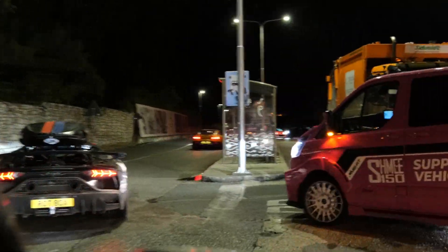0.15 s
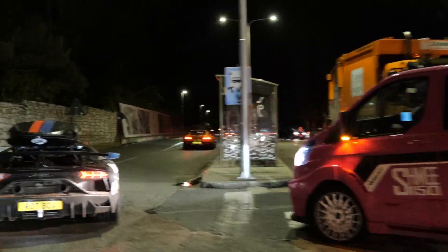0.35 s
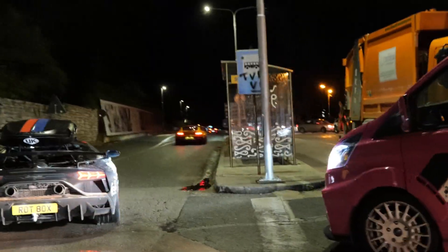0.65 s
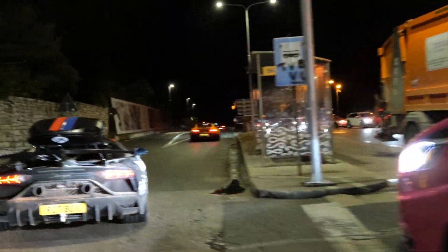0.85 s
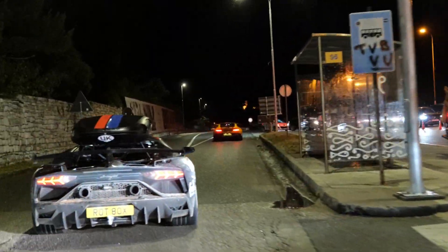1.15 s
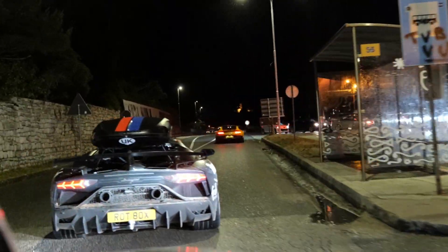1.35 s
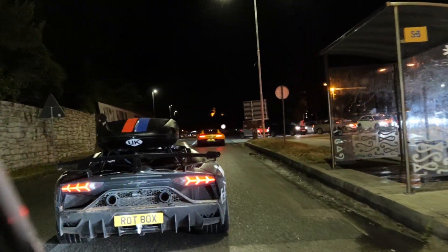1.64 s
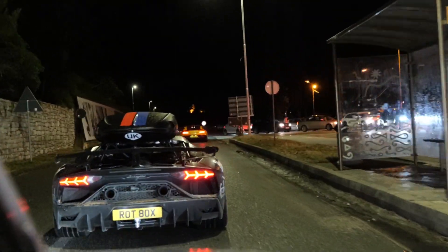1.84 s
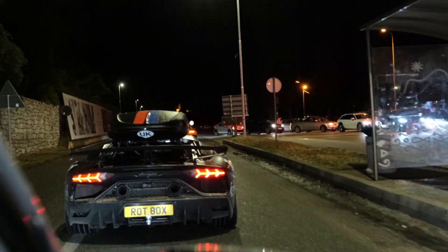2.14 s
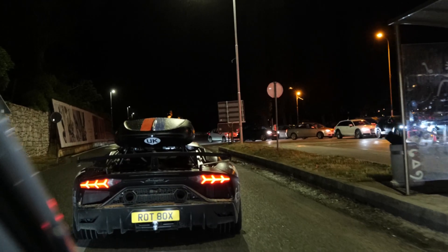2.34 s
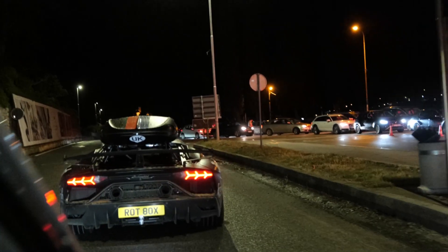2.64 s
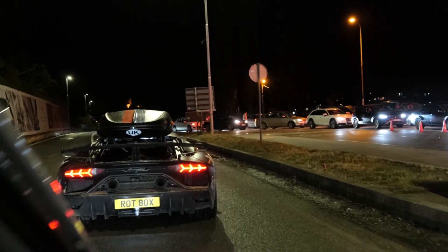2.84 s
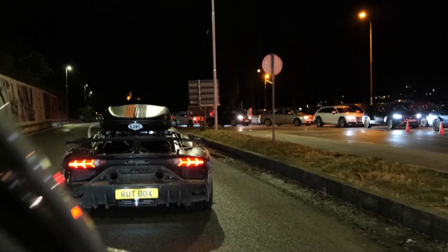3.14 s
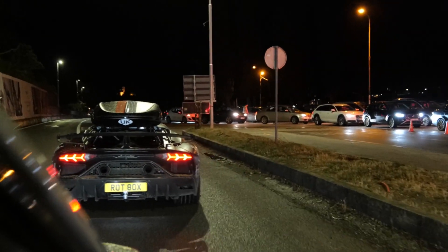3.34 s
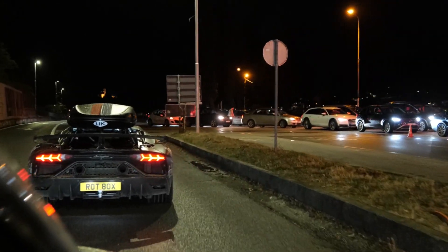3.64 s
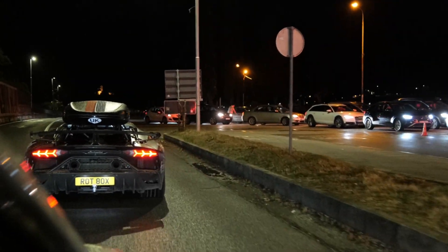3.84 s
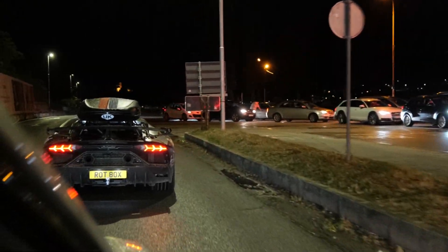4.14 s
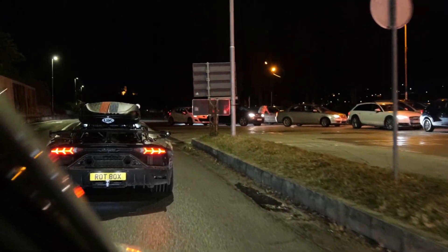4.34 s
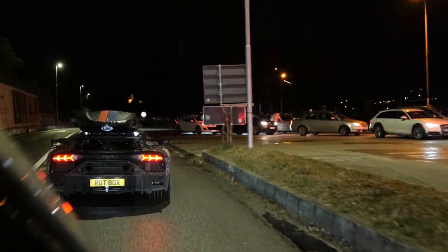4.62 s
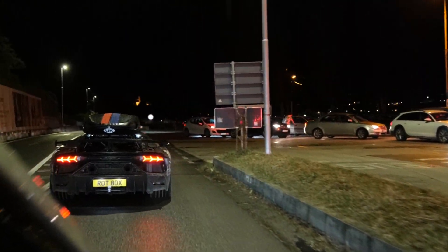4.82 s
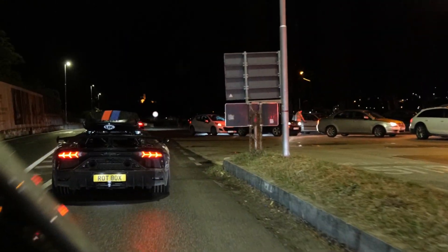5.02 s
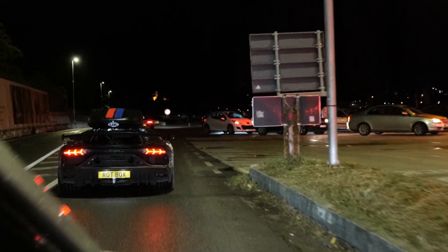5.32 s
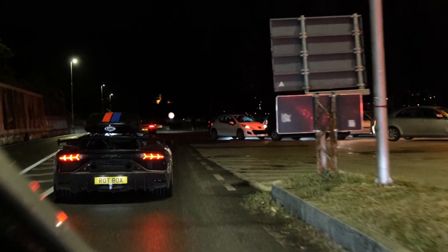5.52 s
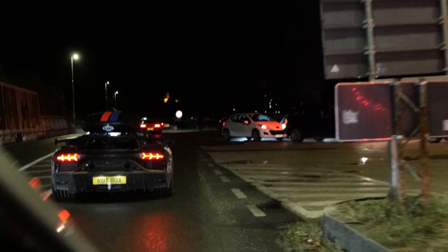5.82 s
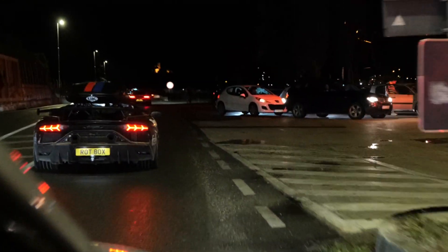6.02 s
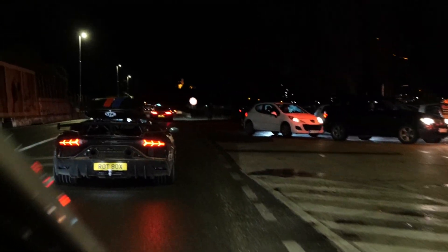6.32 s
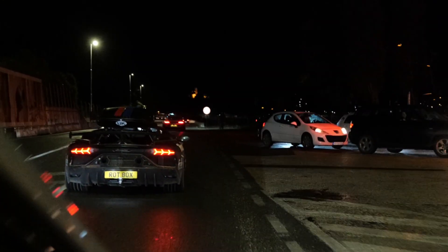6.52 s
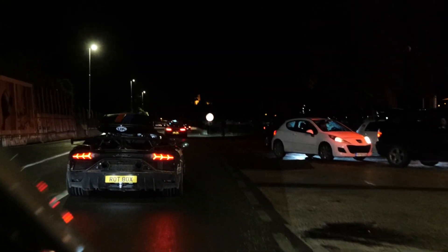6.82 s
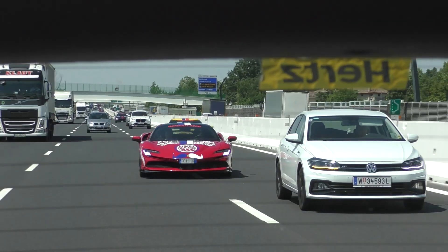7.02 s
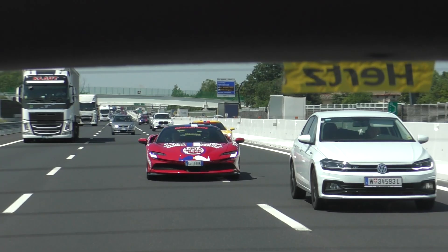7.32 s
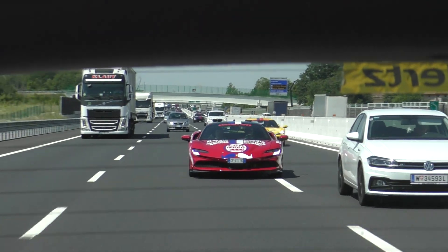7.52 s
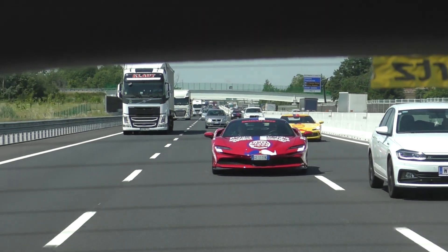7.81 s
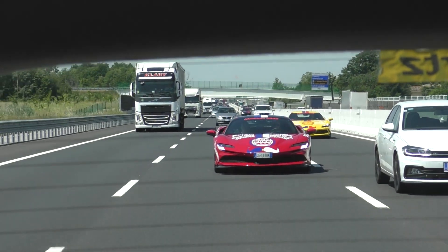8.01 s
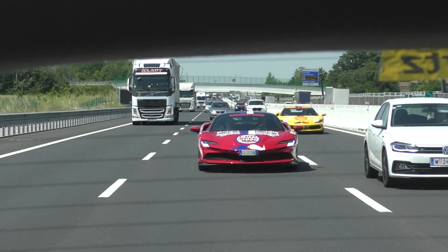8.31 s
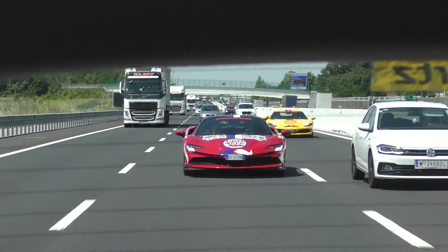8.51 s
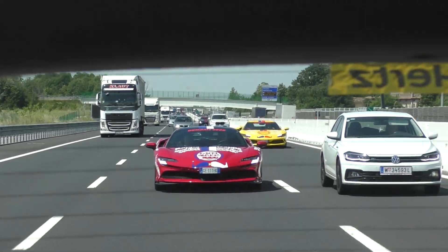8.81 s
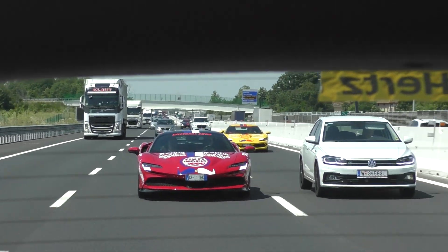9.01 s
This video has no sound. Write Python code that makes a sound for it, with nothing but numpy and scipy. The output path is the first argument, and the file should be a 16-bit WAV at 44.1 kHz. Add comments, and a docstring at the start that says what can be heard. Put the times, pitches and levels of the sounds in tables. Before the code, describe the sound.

Inside a sports car in town, an engine drones over low road rumble. A short whistling chirp and a booming thump mark an upshift; the pitch drops, shudders, then climbs hard with a hollow, rasping exhaust. The throttle closes and the exhaust crackles and pops in clumps. A hard cut brings a closed motorway cabin with steady tyre rumble, muffled wind and a soft hum.

```python
"""A droning engine over road rumble, heard inside a sports car: it chirps and thumps through an upshift,
then pulls hard with a rasping exhaust. The throttle closes and the exhausts crackle and pop.
Then the scene changes abruptly to a closed cabin on a motorway, with road rumble and a steady hum.
Engine and hum are tones following a speed curve; gas, air, road and crackle are shaped noise; pops are
push-and-suction pulses. Cabin reflections spread each scene over left and right."""
import sys
import numpy as np
from scipy import signal
from scipy.fft import rfft, irfft
from scipy.io import wavfile
from scipy.ndimage import uniform_filter1d

SR = 44100
rng = np.random.default_rng(int(sys.argv[2]) if len(sys.argv) > 2 else 0)


def wrap_up_sound(samples):
    """Save the sound to the file named by the first command line argument, as 16-bit audio."""
    columns = np.atleast_2d(samples).T
    # keep every value between -1 and 1, then stretch to whole-number steps
    tamed = np.clip(columns, -1, 1)
    steps = np.round(tamed * 32767).astype(np.int16)
    wavfile.write(sys.argv[1], SR, steps)


N = 403956
T = np.arange(N) / SR  # seconds
HZ = np.fft.rfftfreq(N, 1 / SR)
CUT_S = 6.9  # town gives way to motorway

# single reports in the exhaust, before trim and muffling:
# start_s, peak_db, centre_hz, ring_db (ring of the pipes)
POPS = [(3.246, -11, 400, -24), (4.939, -17, 500, -25), (5.063, -15, 420, -25), (5.088, -13, 190, -26),
        (5.126, -14, 450, -25), (5.187, -15, 600, -25), (5.302, -16, 450, -28), (5.325, -14, 1000, -24),
        (5.371, -15, 170, -27), (5.421, -12, 170, -21), (5.426, -14, 650, -24), (5.436, -14, 550, -22),
        (5.445, -12, 480, -22), (5.461, -18, 1000, -35), (5.487, -15, 550, -26), (5.494, -17, 1100, -28),
        (5.526, -14, 600, -26), (5.549, -15, 480, -25), (5.572, -13, 520, -23), (5.617, -11, 500, -21),
        (5.633, -16, 600, -30), (5.661, -14, 450, -25), (5.67, -10, 650, -22), (5.712, -17, 800, -32),
        (5.753, -12, 650, -24), (5.774, -14, 600, -27), (5.795, -14, 480, -21), (5.818, -15, 500, -24),
        (5.828, -14, 1300, -25), (5.843, -10, 450, -19), (5.859, -11, 420, -21), (5.879, -15, 1700, -33),
        (5.9, -16, 900, -26), (5.936, -14, 1700, -31), (5.977, -15, 650, -25), (5.991, -11, 480, -24),
        (6.017, -17, 2200, -33), (6.101, -16, 600, -24), (6.167, -12, 400, -24), (6.182, -12, 1700, -27),
        (6.244, -16, 1400, -25), (6.313, -18, 1100, -38), (6.339, -7, 190, -22), (6.351, -15, 550, -26),
        (6.431, -16, 450, -27), (6.449, -16, 700, -25), (6.509, -15, 550, -23), (6.536, -11, 190, -23),
        (6.618, -17, 600, -28), (6.663, -15, 800, -22), (6.667, -11, 900, -22), (6.679, -13, 900, -21),
        (6.685, -11, 1100, -24), (6.688, -13, 1800, -30), (6.728, -13, 520, -23), (6.737, -18, 900, -24),
        (6.744, -19, 1200, -28), (6.798, -12, 1300, -31), (6.835, -10, 700, -23), (6.845, -16, 800, -25),
        (6.865, -14, 650, -29)]


def amp(db):
    """Decibels to gain."""
    return 10 ** (np.asarray(db) / 20)


def evened(x):
    """Scales to rms 1."""
    return x / np.sqrt(np.mean(x ** 2) + 1e-20)


def steadied(x, span_s=0.13):
    """Holds the short-term rms at 1 and keeps the fine grain."""
    return x / np.sqrt(abs(uniform_filter1d(x ** 2, int(span_s * SR))) + 1e-20)


def curves(rows):
    """Each column of a table of time rows, at every sample."""
    s, *columns = np.transpose(rows)
    return [np.interp(T, s, c) for c in columns]


def ramp(start, end):
    """Rises from 0 to 1 between two times."""
    return np.clip((T - start) / max(end - start, 1e-3), 0, 1)


def waver(rate_hz, size=64):
    """Slow random drift of rms 1, drawn on every 64th sample."""
    t = T[::size]
    hz = np.fft.rfftfreq(len(t), t[1])
    spectrum = rfft(rng.standard_normal(len(t))) / (1 + (hz / rate_hz) ** 2)
    return np.interp(T, t, evened(irfft(spectrum, len(t))))


def response(points):
    """Gain at every frequency from (Hz, dB) points, joined on a log frequency axis."""
    f, db = np.transpose(points)
    return amp(np.interp(np.log(HZ + 1), np.log(f + 1), db))


def band(lo_hz, hi_hz, order=12):
    """Gain of a band with soft shoulders."""
    return 1 / np.sqrt((1 + (lo_hz / (HZ + 1)) ** order) * (1 + (HZ / hi_hz) ** order))


def shaped(x, gain):
    """Filters with a gain over frequency."""
    return irfft(rfft(x) * gain, N)


def struck(x, gain):
    """Filters causally (minimum phase), so that clicks keep a sharp front."""
    cepstrum = irfft(np.log(gain + 1e-6), N)
    fold = (1 + np.sign(N / 2 - np.arange(N))) / (1 + (T == 0))
    return shaped(x, np.exp(rfft(cepstrum * fold)))


def partial(turns, rough):
    """A tone of one cycle per turn, roughened by random shake in both its quadratures."""
    angle = 2 * np.pi * turns
    in_phase = np.cos(angle) * (1 + rough * waver(8))
    return -np.sqrt(2) * (in_phase + np.sin(angle) * rough * waver(11))


def add(mix, s, sound):
    """Lays a sound into the mix at a time."""
    part = mix[round(s * SR):][:len(sound)]
    part += sound[:len(part)]


def rumble(lumpy_db=3.5):
    """Tyres and body panels give a lumpy low noise under a smooth hiss of air."""
    # low noise of tyres and body in town: time_s, level_db
    rumble_level = [(0, -27), (1.0, -26.5), (1.8, -26), (2.4, -20.5), (3.1, -24.5), (3.6, -22.5),
                    (4.3, -27), (5.25, -25), (5.38, -22), (5.6, -25.5), (5.8, -25.5), (6.9, -26)]
    # tint of that noise: freq_hz, relative density_db
    rumble_colour = [(20, -55), (45, -43.5), (65, -39), (90, -14), (125, -1), (210, 6.5), (300, -1),
                     (450, -4), (600, -9), (1200, -19), (5500, -48.5), (10000, -53.5), (15000, -67)]
    # steady hiss of air in the cabin in town: time_s, level_db
    air_level = [(0, -49.5), (2.4, -42), (4.5, -50.5), (5.35, -48.5), (5.5, -55.5), (6.9, -55.5)]
    db, = curves(rumble_level)
    air_db, = curves(air_level)
    noise = shaped(rng.standard_normal(N), response(rumble_colour))
    low = amp(db + lumpy_db * waver(18)) * evened(shaped(noise, band(15, 2200)))
    hiss = amp(air_db) * evened(shaped(noise, band(2600, 15500, order=6)))
    return low + hiss


def motorway(lumpy_db=1.0, gust_db=-1.0):
    """Road rumble, tyre roar and muffled wind in a closed cabin, with the engine humming through."""
    # tint of the cabin noise: freq_hz, relative density_db
    cruise_colour = [(20, -28), (52, -7), (62, 2), (80, 0), (110, 3.5), (145, -3), (185, 1.5), (235, 1),
                     (280, 0.5), (309, 5), (328, -2.5), (360, 0.5), (430, -10), (465, -9), (500, -12),
                     (615, -19), (645, -12.5), (668, -20), (745, -17.5), (780, -26), (930, -24.5),
                     (985, -20), (1050, -30), (1115, -26.5), (1200, -30), (2000, -42), (2800, -48),
                     (5200, -54.5), (7000, -61), (14000, -75)]
    # wind hiss at the window seals, before the overall rise: time_s, level_db
    seal_hiss = [(6.9, -62), (7.6, -64), (8.4, -62), (9.16, -60.5)]
    # engine at a nearly steady speed, easing off: time_s, pitch_hz, level_db
    hum_curve = [(6.9, 237.4, -24), (7.2, 236.5, -28.5), (7.35, 235, -21.5), (7.6, 235, -27),
                 (8.05, 234.5, -25), (8.25, 234.7, -29), (9.16, 235.5, -33)]
    # levels at the change of scene, and a slow rise of the road and wind noise
    road_db, tyres_db, wind_db, rise_db_per_s = -24.5, -32.5, -37.5, 0.56

    air, colour = rng.standard_normal(N), response(cruise_colour)
    road = amp(road_db + lumpy_db * waver(7.7)) * evened(shaped(air, colour * band(15, 248)))
    tyre_noise = shaped(rng.standard_normal(N), colour * band(286, 500))
    tyres = amp(tyres_db + lumpy_db * waver(10)) * evened(tyre_noise)
    wind = amp(wind_db + gust_db * waver(22)) * evened(shaped(air, colour * band(527, 2400)))
    hiss_noise = shaped(rng.standard_normal(N), colour * band(2320, 15000))
    hiss = amp(curves(seal_hiss)[0]) * evened(hiss_noise)
    hum_hz, hum_db = curves(hum_curve)
    hum = amp(hum_db) * partial(np.cumsum(hum_hz) / SR, rough=0.07)
    return (road + tyres + wind + hiss) * amp(rise_db_per_s * (T - CUT_S)) + hum


def bright_bursts(q=1.4):
    """Brief noise bursts, each through one broad resonance, then kept to the treble."""
    # ticks, a hiss at the shift, a puff of gas, sharp exhaust cracks, with levels before filtering:
    # start_s, level_db, centre_hz, decay_s
    burst_list = [(.745, -23.5, 11450, 0.0015), (.805, -38.5, 8900, 0.039), (0.88, -35, 6560, 0.017),
                  (1.042, -36.5, 11530, .004), (1.056, -39, 11960, 0.0063), (1.291, -39.5, 10060, 0.0084),
                  (4.07, -43.5, 4500, 0.031), (4.939, -42.5, 9260, 0.002), (5.379, -47.5, 9800, 0.0059),
                  (6.573, -32.5, 3200, .001), (6.618, -36.5, 5000, 0.0008)]
    out, t = np.zeros(N), T[:4096]
    for s, db, hz, decay in burst_list:
        noise = rng.standard_normal(len(t)) * np.exp(-t / decay)
        burst = signal.lfilter(*signal.iirpeak(hz, q, fs=SR), noise)
        add(out, s, amp(db) * burst)
    return shaped(out, band(2500, 12000, order=10))


def narrow_tones():
    """Noise narrowed to a gliding band gives unsteady tones that swell and fade."""
    # breathy whistles, and engine overtones that swell in a pipe resonance, with levels before fades:
    # start_s, end_s, first_hz, last_hz, width_hz, level_db
    tone_list = [(0, 0.741, 1240, 1238, 50.3, -46.5), (0, 0.691, 1843, 1786, 160, -40.5),
                 (1.354, 1.72, 5290, 6170, 270, -52), (1.485, 1.747, 4080, 4150, 200, -43),
                 (1.453, 2.155, 3083, 2723, 280, -41), (1.848, 2.205, 2337, 2250, 280, -36),
                 (1.991, 2.248, 4230, 4110, 100, -49), (2.867, 3.178, 552, 562, 11, -27),
                 (2.908, 3.21, 1241, 1296, 150, -33.5), (3.302, 3.49, 1430, 1370, 200, -34),
                 (3.948, 4.146, 1006, 1046, 80, -28.5), (3.964, 4.132, 3650, 3680, 150, -40.5),
                 (4.183, 4.316, 1010, 1002, 100, -31), (4.349, 5.248, 1742, 1837, 260, -42.5),
                 (4.7, 5.501, 4500, 4600, 710, -59)]
    out = np.zeros(N)
    for start, end, first_hz, last_hz, width_hz, db in tone_list:
        size = max(int((end - start) * SR), 64)
        noise = (rng.standard_normal(N) + 1j * rng.standard_normal(N))[:size]
        ring = signal.lfilter(*signal.butter(2, width_hz / 2, fs=SR), noise)
        glide_turns = np.cumsum(np.linspace(first_hz, last_hz, size)) / SR
        tone = (ring * np.exp(2j * np.pi * glide_turns)).real
        add(out, max(start, 0), amp(db) * evened(tone) * signal.windows.tukey(size, .5))
    return out


def chirp(waver_hz=20):
    """A short unsteady whistle as the gear changes."""
    # glide of the whistle, about which the pitch wavers: time_s, pitch_hz, level_db
    glide = [(.67, 1370, -46), (.695, 1435, -34.5), (.725, 1490, -36), (.745, 1560, -30),
             (.78, 1585, -32.5), (.81, 1605, -29.5), (.855, 1605, -28.5), (.88, 1550, -35),
             (.92, 1510, -52)]
    hz, db = curves(glide)
    tone = partial(np.cumsum(hz + waver_hz * waver(110)) / SR, rough=0.15)
    return tone * amp(db) * (T > glide[0][0]) * (T < glide[-1][0])


def shift_thump(s=.867, db=-14, decay_s=0.026):
    """The next gear engages: a blow that booms briefly in the pipes and cabin."""
    # resonances of pipes and cabin, relative to the blow: freq_hz, level_db
    modes = [(125, -7.5), (215, 8), (280, -9.5), (530, -7.5)]
    out, t = np.zeros(N), T[:8192]
    boom = sum(amp(mode_db) * np.sin(2 * np.pi * hz * t) for hz, mode_db in modes)
    add(out, s, amp(db) * boom * np.exp(-t / decay_s))
    return struck(out, band(115, 800, order=10))


def lulls():
    """Gain of the crackle: a misfire leaves a lull, then its fuel goes off as a pop."""
    lull_s, lull_db = .022, -7.5
    dip, window = np.zeros(N), signal.windows.hann(int(lull_s * SR))
    for s, *_ in POPS:
        add(dip, s - .8 * lull_s, window)  # deepest just before the pop
    return amp(lull_db * np.minimum(dip, 1))


def crackle(per_s=330, spread_db=1.5, clump_db=1.2):
    """Unburnt fuel fires in the pipes as a spatter of small bangs that come in clumps."""
    # closed throttle: it swells, dies down and flares twice more: time_s, level_db
    overrun = [(4.8, -24.5), (5.3, -28), (5.45, -25.5), (5.84, -21), (6.05, -29.5), (6.45, -28),
               (6.64, -33.5), (6.675, -22.5), (6.705, -30.5), (6.84, -24.5), (6.9, -41.5)]
    # tint of the spatter: freq_hz, relative density_db
    crackle_colour = [(50, -22.5), (100, -4), (150, 2), (250, -19.5), (450, -3), (600, -4), (850, -10.5),
                      (1200, -16), (1800, -17.5), (2500, -28.5), (3500, -43.5), (4500, -43), (5500, -67),
                      (15000, -80)]
    # the sharp top fades as the pipes empty; its level is relative to the body at close_s
    top_db, top_db_per_s, close_s = -14, -1, 5.23

    sizes = amp(spread_db * np.minimum(rng.exponential(1, N), 2.6))
    bangs = sizes * (rng.random(N) < per_s / SR)
    spatter = (evened(bangs) + .5 * rng.standard_normal(N)) * amp(clump_db * waver(35))
    level_db, = curves(overrun)
    colour = response(crackle_colour)
    body = steadied(struck(spatter, colour * band(84, 1550, order=8)))
    sharp = steadied(struck(spatter, colour * band(1400, 15000, order=8)))
    top = amp(top_db + top_db_per_s * (T - close_s)) * sharp
    return amp(level_db) * (body + top) * lulls() * ramp(4.13, close_s)


def pops(scatter=0.045, scatter_s=0.0045):
    """A larger bang is a rounded push and a suction, trailed by road scatter and a short ring of the pipes."""
    # the muffling of a bang: freq_hz, gain_db
    pop_colour = [(30, -25), (70, -12), (160, 1), (1200, 0.5), (2200, -.5), (3400, -3), (4600, -11),
                  (5600, -18.5), (10000, -27), (16000, -39)]
    pop_trim_db, ring_trim_db, ring_decay_s = .3, -5.5, .0045
    pipes = signal.butter(2, [320, 950], "band", fs=SR)  # the pipes' ringing band in Hz

    out, t = np.zeros(N), T[:2048]
    for s, db, hz, ring_db in POPS:
        u = 2 * np.pi * hz * t
        push_and_suction = u * (2 - u) * np.exp(-u)
        echoes = (t == 0) + scatter * rng.standard_normal(len(t)) * np.exp(-t / scatter_s)
        bang = signal.fftconvolve(push_and_suction, echoes)
        add(out, s, amp(db + pop_trim_db) * bang / abs(bang).max())
        ring = signal.lfilter(*pipes, rng.standard_normal(len(t)) * np.exp(-t / ring_decay_s))
        add(out, s, amp(ring_db + ring_trim_db) * ring / ring[t < ring_decay_s].std())
    return struck(out, response(pop_colour))


def turbulence(turns, pulsing=0.27, flutter_db=0.8):
    """Each firing lets out a puff of gas; bounces that slowly lengthen comb the rush into a hollow rasp."""
    # road, wall and bodywork send the roar back: delay_s at the start, gain (linear)
    bounces = [(.0047, .3), (.0088, .22), (.0118, .2)]
    growth_per_s = .035
    firing_pulse = 1 + pulsing * np.cos(8 * np.pi * turns)  # four firings a turn
    puffs = rng.standard_normal(N) * firing_pulse * amp(flutter_db * waver(34))
    body = shaped(puffs, band(200, 3500, order=4))
    returned = sum(gain * np.interp(T - delay_s * (1 + growth_per_s * T), T, body)
                   for delay_s, gain in bounces)
    return puffs + returned


def rasp(flow, excess_db, wander=0.04, swell_db=3.0, by_flow=1.3):
    """The gas rings resonances that wander and surge, each on its own, the more the harder it flows."""
    # resonances about which they wander: centre_hz, width_hz, level_db at nominal flow
    resonances = [(1280, 370, -58), (2270, 1300, -60.5), (4200, 600, -57)]
    out = np.zeros(N)
    for hz, width_hz, db in resonances:
        # shift the resonance down to zero, low-pass it there, and shift it back
        turn = np.exp(2j * np.pi * np.cumsum(hz * (1 + wander * waver(2.0))) / SR)
        ring = (turn * signal.lfilter(*signal.butter(2, width_hz / 2, fs=SR), flow / turn)).real
        out += evened(ring) * amp(db + swell_db * waver(7.2))
    return out * amp(by_flow * excess_db)


def exhaust_gas(turns, crank_hz, surge_db=0.73):
    """A broad roar that brightens with the flow, with the rasp on top."""
    # registers of the roar: low_hz, high_hz, nominal level_db, db per db of flow, db per turn a second
    registers = [(490, 1310, -36, 1.91, 0.5), (1170, 5950, -33, 1.0, 0), (4500, 17000, -49, 2, 0)]
    # tint of the rush: freq_hz, relative density_db
    gas_colour = [(550, 3.5), (750, -1), (950, -4), (1280, -2.5), (1550, -4.5), (1850, -4.5), (2400, -9),
                  (3200, -13), (4200, -23), (5200, -28), (7500, -32), (9700, -32.5), (12000, -42.5),
                  (15000, -49)]
    # gas rushing from the exhaust, strongest in the pull: time_s, flow_db
    flow_curve = [(0, -30.5), (.1, -30.5), (.2, -35.5), (.72, -36), (.89, -28), (.98, -32), (1.15, -29),
                  (1.42, -29.5), (1.6, -25.5), (1.78, -29), (1.99, -24.5), (2.1, -26), (2.62, -25.5),
                  (2.88, -26), (3.04, -26), (3.17, -26), (3.28, -30.5), (3.42, -28), (3.6, -30),
                  (3.93, -28), (4.02, -28.5), (4.09, -25), (4.135, -33), (4.25, -28.5), (4.4, -35.5),
                  (4.6, -41), (5.3, -47)]
    nominal_flow_db, nominal_turns_per_s, end_s = -30, 44, 6.9

    flow, colour = turbulence(turns), response(gas_colour)
    excess_db = curves(flow_curve)[0] - nominal_flow_db
    excess_speed = crank_hz - nominal_turns_per_s
    gas = np.zeros(N)
    for lo, hi, db, by_flow, by_speed in registers:
        level_db = db + by_flow * excess_db + by_speed * excess_speed
        gas += amp(level_db) * steadied(shaped(flow, colour * band(lo, hi)))
    return (gas + rasp(flow, excess_db)) * amp(surge_db * waver(12.0)) * (T < end_s)


def crank_speed():
    """Turns a second; the driveline shudders and settles after the new gear takes up the load."""
    # held, dropped by the upshift, then a steady climb, before the shudder: time_s, turns_per_s
    speed_curve = [(0, 49.4), (.08, 51.1), (.3, 50.5), (.52, 51.35), (.68, 49.6), (.8, 41.3), (.85, 30.6),
                   (.93, 29.7), (1.05, 31.7), (1.45, 32.1), (2.15, 36.3), (2.7, 40.45), (3.8, 49.3),
                   (4.6, 55.2), (5.12, 58), (5.28, 56), (5.42, 32)]
    start_s, shudder_hz, depth_turns_per_s, decay_s = 1.08, 4.03, 2.17, 0.4
    speed, = curves(speed_curve)
    since = np.maximum(T - start_s, 0)
    return speed + depth_turns_per_s * np.sin(2 * np.pi * shudder_hz * since) * np.exp(-since / decay_s)


def engine_note(turns, crank_hz, throb_db=0.4, burble_rough=.13, burble_lag=.25):
    """Orders of crank speed follow the load and sweep the resonances of pipes and cabin.
    Drone and burble line up loosely into a beat each turn; the overtones ring on out of step."""
    # load on the engine: a stutter for the shift, on again, then closed: time_s, level_db
    load = [(0, -1), (.68, -1), (.74, -8), (.77, -0.5), (.81, -3.5), (.96, -6), (1.06, -4), (1.7, 0.5),
            (2.5, 0), (3.0, 2.5), (3.3, -3), (3.42, -8.5), (4.82, 4.5), (5.0, -5), (5.22, -1.5),
            (5.36, -10)]
    # pipes and cabin; each order swells as it climbs through a resonance: freq_hz, gain_db
    pipe_colour = [(100, -24), (114, -10.5), (126, -9.5), (152, -22), (178, -20.5), (186, -8.5), (213, -8),
                   (228, -16.5), (248, -27.5), (268, -17.5), (297, -13), (318, -26.5), (345, -27),
                   (365, -28.5), (412, -19), (470, -36.5), (505, -27), (532, -21), (558, -21), (590, -21),
                   (630, -31.5), (668, -21), (700, -30.5), (780, -37), (1020, -36), (1230, -22.5),
                   (1600, -26.5)]
    # four firings a turn and their octave: multiple of crank speed, level_db, roughness (0-1)
    drone_orders = [(4, 0.3, 0.06), (8, -3, 0.1)]
    # the level of the firing note wavers: time_s, gain_db
    drone_swell = [(.7, 1), (.97, -8), (1.06, 0.5), (1.53, -3), (1.62, -5.5), (1.73, 0), (1.9, 1),
                   (2.02, -3), (2.2, 7), (2.4, 3.5), (2.58, 8.5), (2.7, -2.5), (2.9, 2.5), (3.0, -11),
                   (3.2, 2.5), (3.31, -5), (3.44, 8), (3.55, 0), (3.63, 3.5), (3.7, -4), (3.78, 4),
                   (3.88, -0.5), (4.02, 2.5), (4.3, 0.5), (5.25, 1.5), (5.33, -8.5)]
    # unequal cylinders burble between the firing harmonics: multiple of crank speed, level_db
    burble_orders = [(3, -12.5), (5, -15.5), (6, -14), (7, -11), (9, -23.5)]
    # overtones of the pipes: multiple of crank speed, level_db, roughness (0-1)
    blare_orders = [(11, -15, .17), (12, -6.5, .12), (13, -17.5, .2), (14, -19, .25), (15, -16.5, .17),
                    (16, -8.5, .12), (17, -15, .2), (20, -13, .12), (24, -20.5, .2)]
    # burbles while it lugs, blares where the pipes come into tune: turns_per_s, burble_db, blare_db
    voice = [(30, 0, 0), (33.97, -2, 2), (33, -5.5, -2.5), (36.4, -2.5, -5), (43.9, 0.5, -6.5),
             (47, -10, -20), (49.8, -4, -5), (51.34, -11, 2.5), (54.5, -9.5, -8)]
    half_order_db, half_order_rough = -24.5, .45  # weak, ragged lines halfway between the orders
    # start and end in seconds of: ignition cut and return in the shift; fade on the closed throttle
    cut_s, return_s, fuel_off_s = (.808, .82), (.862, .88), (5.22, 5.5)

    load_db, = curves(load)
    pipe = response(pipe_colour)

    def order(k, db, rough, lag=0):
        """One multiple of the crank speed, coloured by the pipes."""
        return amp(db) * np.interp(k * crank_hz, HZ, pipe) * partial(k * turns - lag, rough)

    firing, octave = (order(round(k), db, rough) for k, db, rough in drone_orders)
    drone = amp(curves(drone_swell)[0]) * firing + octave
    burble = sum(order(round(k), db, burble_rough, burble_lag * rng.uniform(-0.81, 1))
                 for k, db in burble_orders)
    growl = sum(order(k, half_order_db, half_order_rough, rng.random()) for k in np.arange(4.5, 11))
    blare = sum(order(round(k), db, rough, rng.random()) for k, db, rough in blare_orders)

    speeds, burble_db, blare_db = np.transpose(voice)
    burble_gain = amp(np.interp(crank_hz, speeds, burble_db))
    blare_gain = amp(np.interp(crank_hz, speeds, blare_db))
    note = drone + burble_gain * (burble + growl) + blare_gain * blare
    spark = 1 - 0.59 * (ramp(*cut_s) - ramp(*return_s))
    return note * amp(load_db + throb_db * waver(23)) * spark * (1 - ramp(*fuel_off_s))


def cabin(x, side_colour, lean_db, decay_s=0.045):
    """Reflections off glass and panels differ left and right; each band leans a little to one side."""
    reflections = rng.standard_normal(N) * np.exp(-T / decay_s)
    scramble = np.exp(1j * np.angle(rfft(reflections)))  # phase only
    side = shaped(x, scramble * response(side_colour))
    lean = response(lean_db)
    left = shaped(x, 2 * lean / (1 + lean)) + side
    right = shaped(x, 2 / (1 + lean)) - side
    return np.array([left, right])


def scene():
    """The pull through town, then the motorway."""
    # reflections in the cabin, in town and on the motorway: freq_hz, gain_db
    town_side = [(30, -4.5), (70, -6.5), (130, -59.5), (220, -28), (300, -32), (500, -17), (1000, -12),
                 (4000, -13), (8000, -23), (13000, -7.5)]
    cruise_side = [(25, -16.5), (60, -20.5), (110, -16), (210, -12.5), (390, -6), (740, -6), (1390, -2),
                   (2600, -1), (8000, -9.5)]
    # balance of the direct sound, in town and on the motorway: freq_hz, left minus right_db
    town_lean = [(150, -0.08), (300, 0.64), (700, 0), (1400, 2.1), (2800, 3.5), (5600, 4.5), (9000, -1),
                 (15000, 14.5)]
    cruise_lean = [(150, 1.7), (350, -1), (700, -5.5), (1400, -0.5), (2800, 3.5), (9000, -1)]

    crank_hz = crank_speed()
    turns = np.cumsum(crank_hz * (1 + 0.0022 * waver(28))) / SR
    pull = rumble() + narrow_tones() + exhaust_gas(turns, crank_hz) + engine_note(turns, crank_hz)
    town = pull + bright_bursts() + chirp() + shift_thump() + crackle() + pops()
    cruising = ramp(CUT_S - .002, CUT_S + .002)
    town_cabin = cabin(town, town_side, town_lean) * (1 - cruising)
    return town_cabin + cabin(motorway(), cruise_side, cruise_lean) * cruising


def record(dry):
    """A steep low-pass limits the band to about 15.6 kHz."""
    lowpass = signal.firwin(511, 15600, window=("kaiser", 9), fs=SR)
    return signal.oaconvolve(dry, lowpass[None], "same")


dry = scene()
out = record(dry)
wrap_up_sound(out)
```